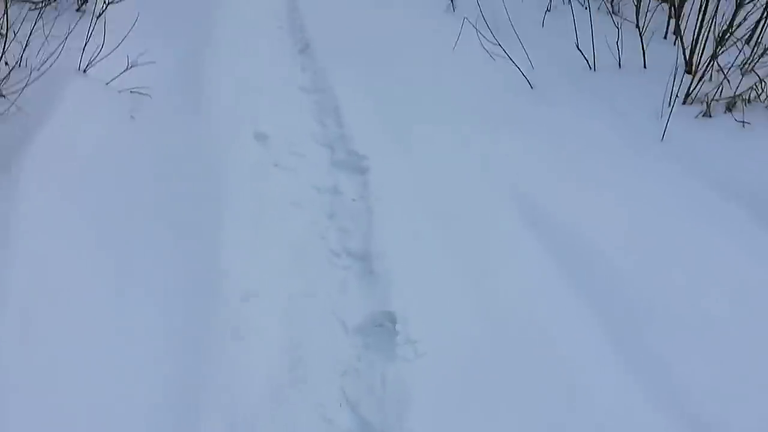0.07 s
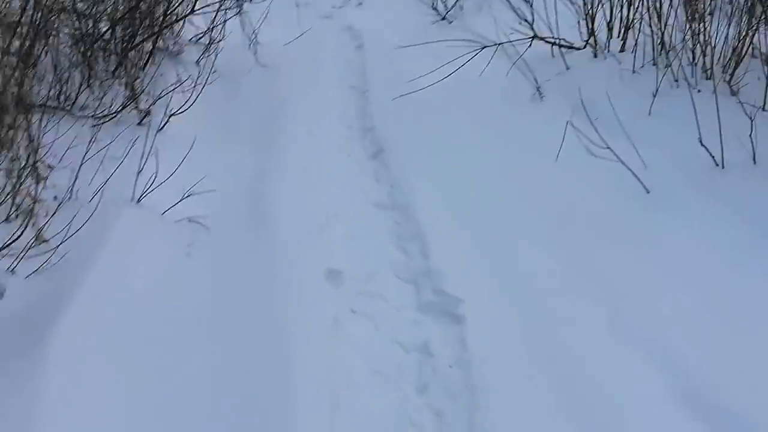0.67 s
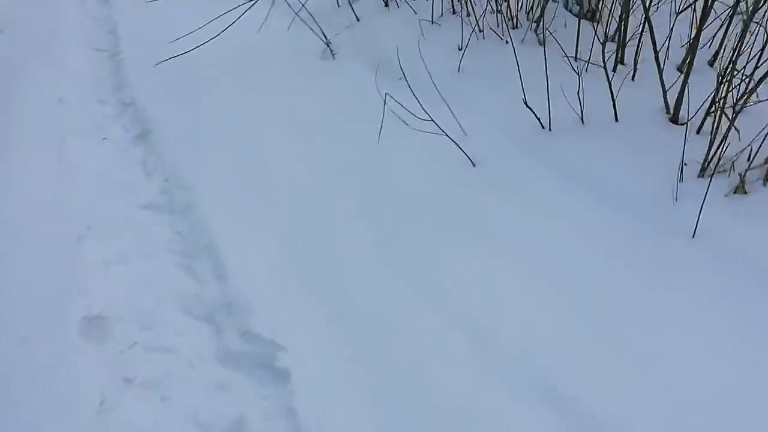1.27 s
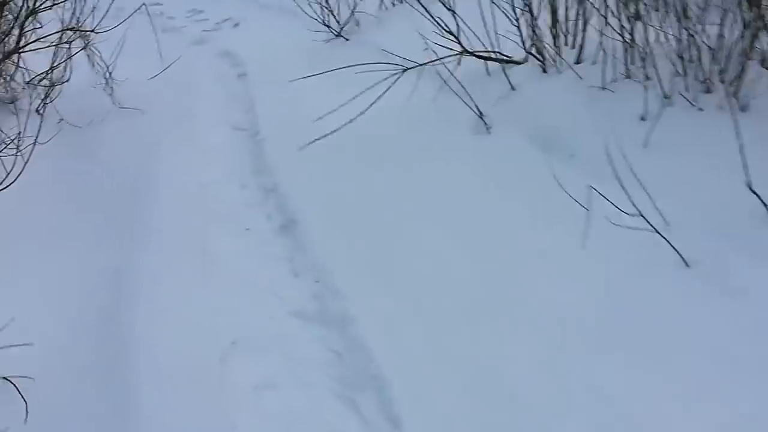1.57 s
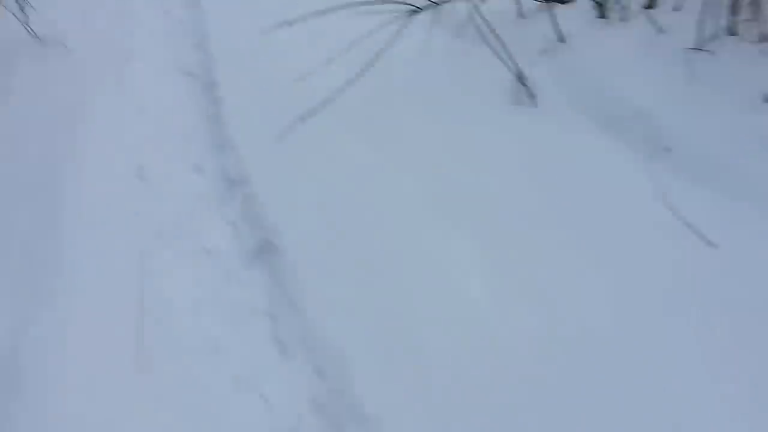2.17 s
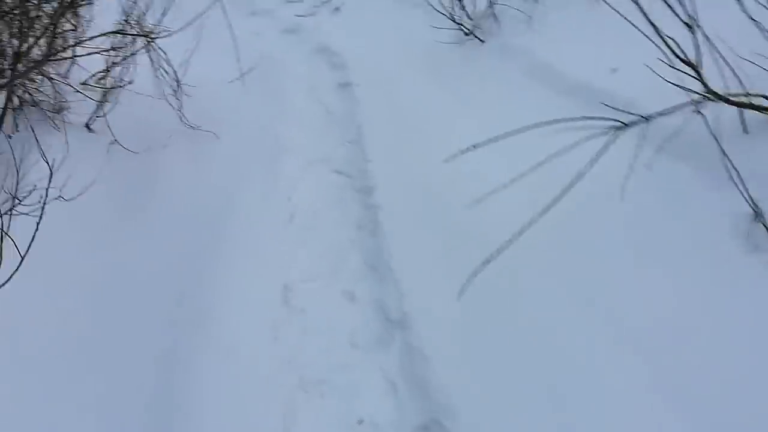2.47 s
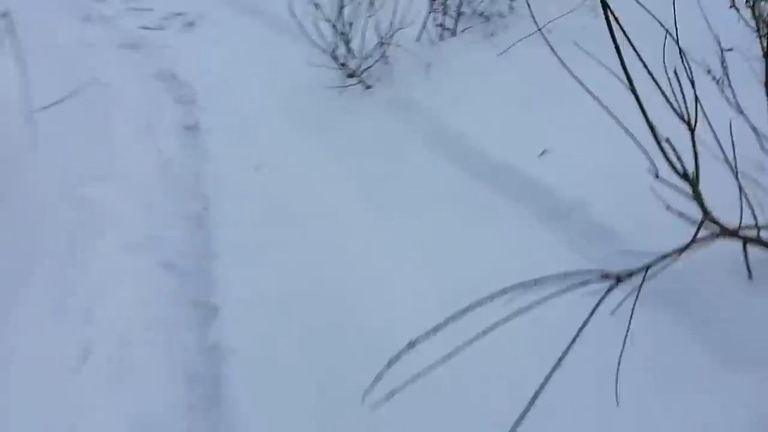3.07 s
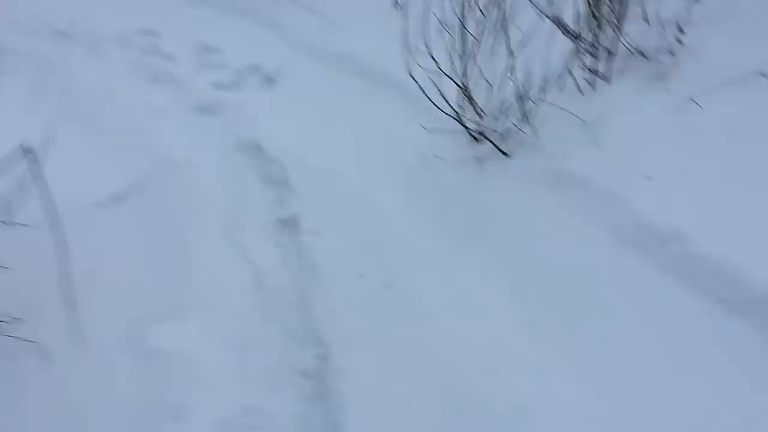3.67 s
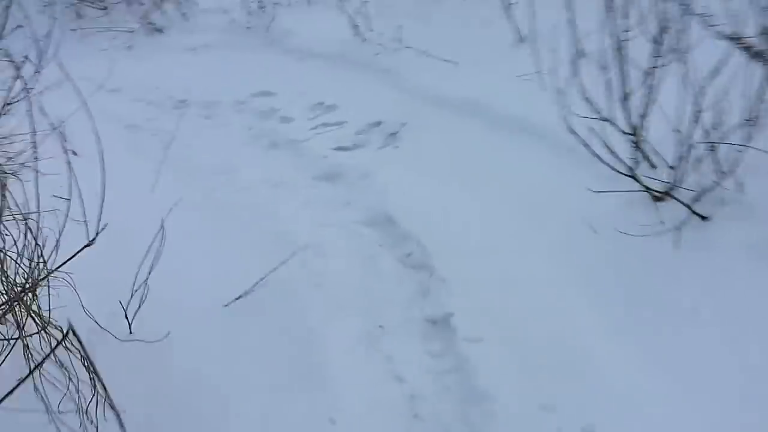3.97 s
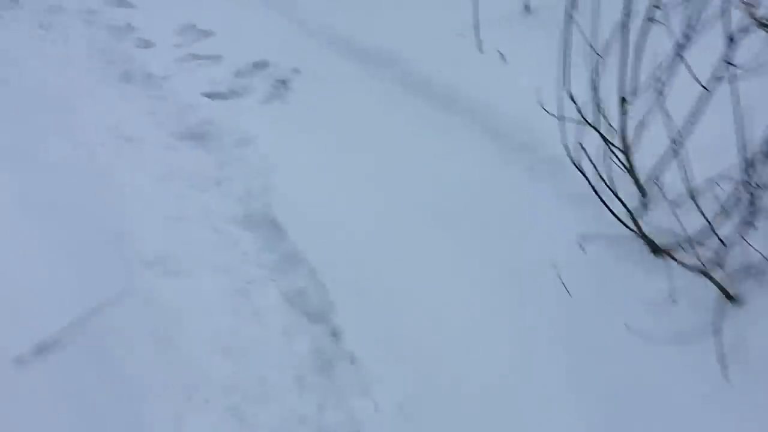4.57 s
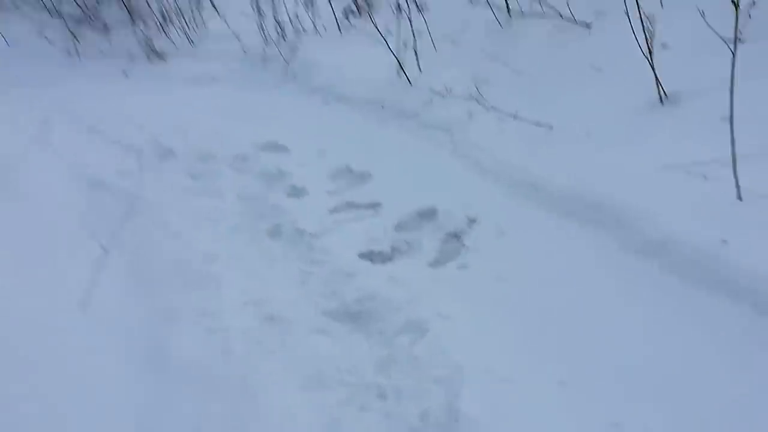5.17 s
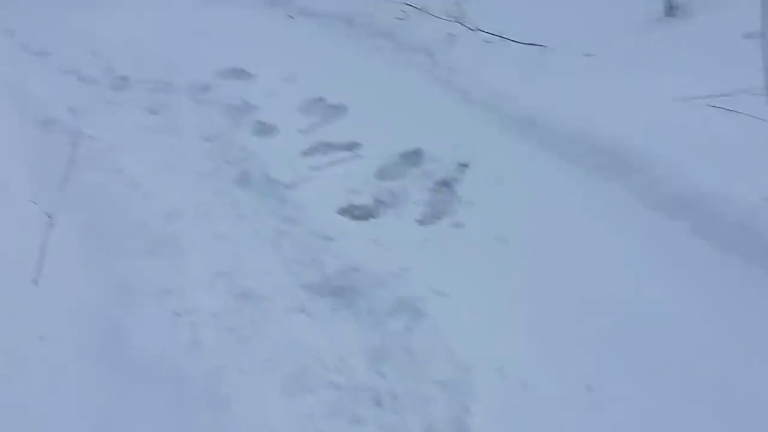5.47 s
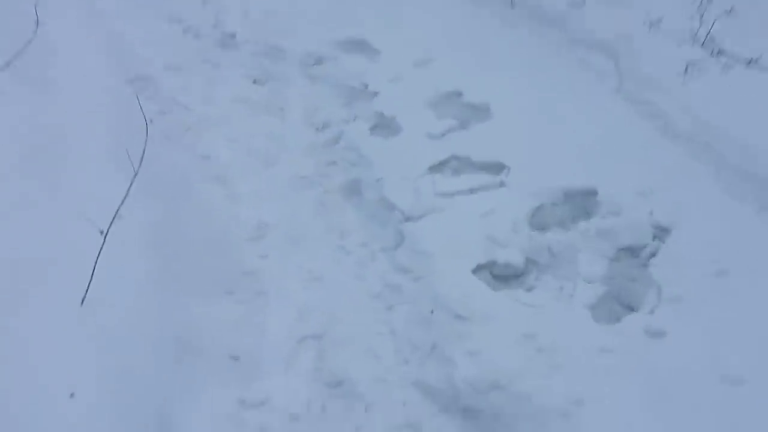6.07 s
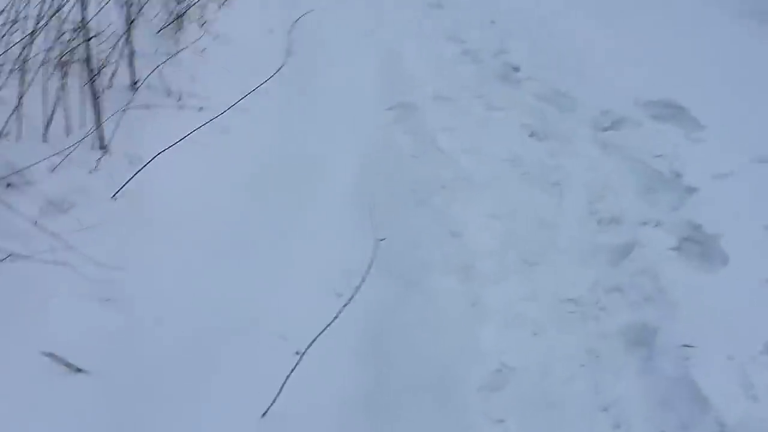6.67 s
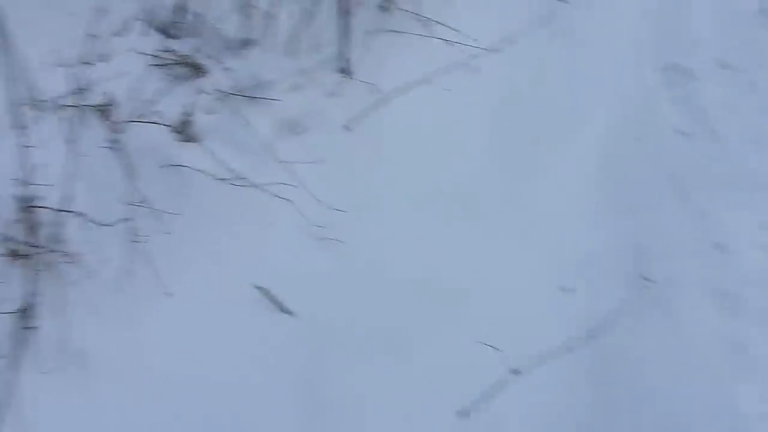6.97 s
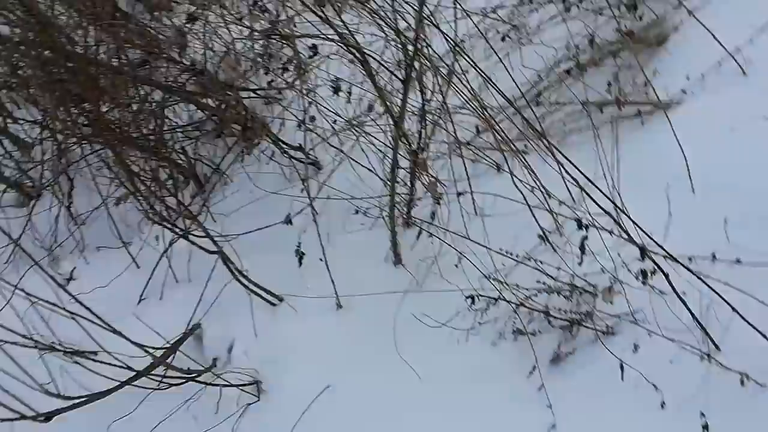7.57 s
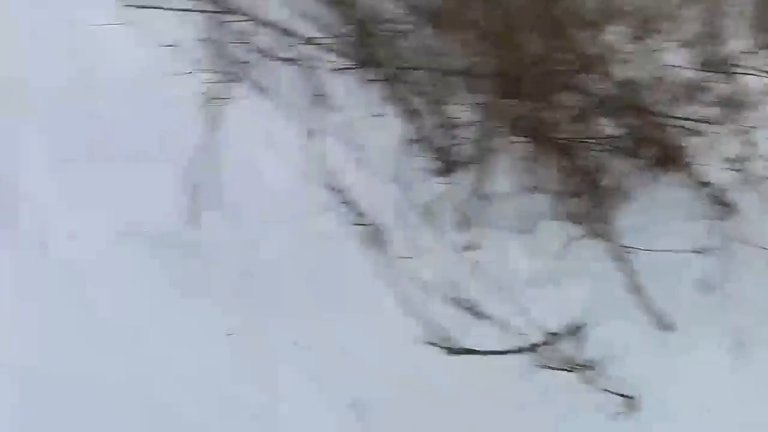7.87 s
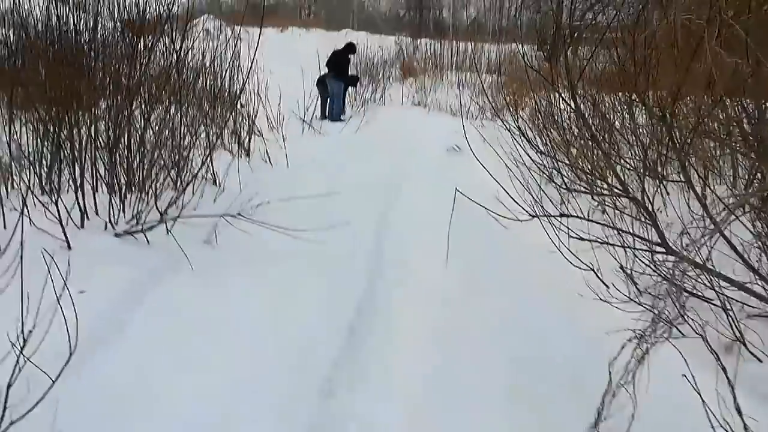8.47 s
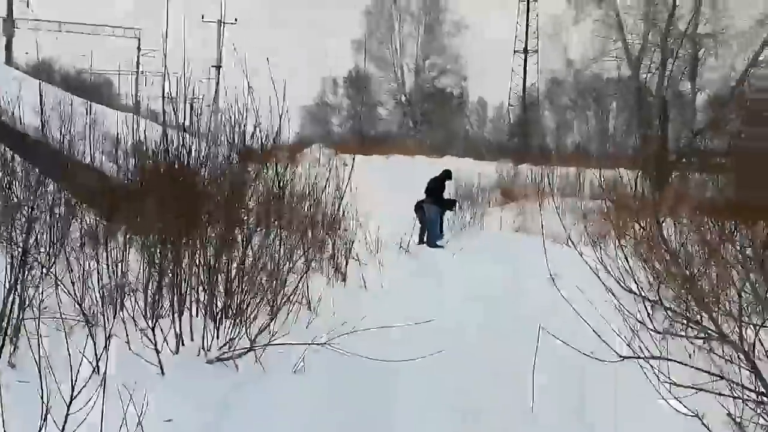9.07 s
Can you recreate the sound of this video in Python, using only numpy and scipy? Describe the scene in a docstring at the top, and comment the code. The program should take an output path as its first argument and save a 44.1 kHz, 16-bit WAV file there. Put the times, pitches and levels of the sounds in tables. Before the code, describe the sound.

Boots crunch and creak through packed snow at a steady walk while wind rumbles on the microphone.

```python
"""Boots crunch along cold, packed snow while wind rumbles on a hand-held camera's microphone.
At about two and a half steps a second, each boot crushes the crust, then creaks in stick-slip as it
rolls off, with single sharp snaps; loose powder hisses. The steps jolt the microphone, the hand knocks
the case now and then, and in the second half a sleeve swishes faintly."""
import sys
import numpy as np
from scipy import signal
from scipy.fft import rfft, irfft, next_fast_len
from scipy.io import wavfile
from scipy.ndimage import uniform_filter1d

SR = 44100
rng = np.random.default_rng(int(sys.argv[2]) if len(sys.argv) > 2 else 0)


def persist_wave(psi):
    """Save psi, clipped to +-1, as 16-bit WAV."""
    counts = np.round(np.clip(psi, -1, 1) * 32767).astype(np.int16)
    wavfile.write(sys.argv[1], SR, np.atleast_2d(counts).T)


N = 411453
N_FFT = next_fast_len(N + 4096, True)
TIME_S = np.arange(N) / SR
CONTROL_S = np.arange(0, N, SR // 1000) / SR
FREQ_HZ = np.fft.rfftfreq(N_FFT, 1 / SR)

def gain(db):
    """Decibels to amplitude."""
    return 10 ** (np.asarray(db) / 20)

def unit_rms(x):
    """Scales to rms 1."""
    return x / np.sqrt(np.mean(x ** 2) + 1e-20)

def steady(x, span_s):
    """Rms near 1 over each span; finer grain stays."""
    power = uniform_filter1d((x ** 2).mean(0), max(int(span_s * SR), 2))
    return x / np.sqrt(abs(power) + 0.0008 * power.mean())

def curve(table, column=1):
    """Table column interpolated over log frequency."""
    rows = np.array(table)
    return np.interp(np.log(FREQ_HZ + 1), np.log(rows[:, 0]), rows[:, column])

def colour(x, spectrum):
    """Filters by rows of freq_hz, gain_db."""
    return irfft(rfft(x, N_FFT) * gain(curve(spectrum)), N_FFT)[..., :N]

def noise_pair(correlation):
    """Partly shared white noise for two ports."""
    shared, own = rng.standard_normal((2, N))
    return np.array([shared, correlation * shared + np.sqrt(1 - correlation ** 2) * own])

def pulses(per_s, jitter, spread_db, count=9000):
    """Uneven clicks; as in stick-slip, a longer wait gives a bigger release."""
    per_s = np.full(N, per_s)
    wait, size = rng.standard_normal((2, count))
    wait = np.exp(jitter * wait)
    at = np.searchsorted(np.cumsum(per_s) / SR, np.cumsum(wait))
    clicks = np.zeros(N + 1)
    clicks[at] = np.sqrt(wait) * gain(spread_db * np.clip(size, -2, 2))
    return unit_rms(clicks[:N] / np.sqrt(per_s))

def tails(clicks, decay_ms):
    """Amplitude envelope of clicks with decaying energy."""
    pole = np.exp(-1000 / (decay_ms * SR))
    return unit_rms(np.sqrt(signal.lfilter([1], [1, -pole], clicks ** 2) + 1e-12))

def packet(hz, swell_ms, count=220):
    """Brief tone that swells and dies; energy 1."""
    t = (np.arange(count) - count // 2) / SR
    wave = np.cos(2 * np.pi * (hz * t + rng.random())) / np.cosh(1000 * t / swell_ms)
    return wave / np.linalg.norm(wave)

def add(mix, centre_s, sound):
    """Mixes in a sound centred on centre_s."""
    part = mix[max(round(centre_s * SR) - len(sound) // 2, 0):][:len(sound)]
    part += sound[:len(part)]

def swell(t, attack_s, hold_s, slope_db, release_s):
    """Rises about t = 0, changes by slope_db over the hold, dies away."""
    rise = np.clip(t / attack_s + .5, 0, 1)
    hold = gain(slope_db * np.clip(t / hold_s, 0, 1))
    return rise * hold * np.exp(-np.maximum(t - hold_s, 0) / release_s)

# Still air spectrum: freq_hz, gain_db
AIR_SPECTRUM = [(200, -34), (500, -12), (1900, -2.5), (2700, -6.5), (7200, -7), (10000, -18),
                (15500, -27.5)]
def still_air(level_db):
    """Faint, even hiss."""
    return gain(level_db) * unit_rms(colour(noise_pair(0.67), AIR_SPECTRUM))

# Breeze on the microphone: time_s, rumble_db, buffet_db
BREEZE = [(0.0, -40, -46.5), (1.27, -43, -55), (1.48, -35.5, -48), (1.97, -36, -33.5), (2.6, -43, -48),
          (3.972, -35, -29.5), (4.44, -39.5, -43.5), (5.74, -39.5, -46), (6.081, -50, -64), (6.5, -40, -47),
          (6.95, -49.5, -58.5), (7.9, -63.5, -69), (8.5, -55.5, -73), (8.73, -45.5, -53.5),
          (9.33, -50, -57)]
# Puffs of air: peak_s, length_s, rumble_db, buffet_db
GUSTS = [(0.127, 0.04, -30, -39), (0.195, 0.13, -35.5, -36.5), (0.95, 0.079, -31, -30.5),
         (1.398, 0.17, -29, -32.5), (1.707, 0.04, -43.5, -25), (1.775, 0.058, -33, -28),
         (1.947, 0.067, -44, -23), (2.335, 0.055, -30, -32.5), (3.144, 0.11, -31.5, -27),
         (3.279, 0.16, -42, -30.5), (3.626, 0.021, -35, -27), (3.943, 0.045, -26, -29.5),
         (4.021, 0.1, -33, -27), (4.697, 0.071, -36, -33.5), (4.762, 0.05, -48, -30.5),
         (5.352, 0.03, -34.5, -33.5), (5.58, 0.17, -35, -35.5), (5.795, 0.038, -35, -33.5),
         (6.418, 0.11, -56, -36.5), (8.645, 0.073, -28, -29)]
def airflow():
    """Rumble and buffet envelopes: short puffs over a breeze that drops as the walker turns."""
    time_s, *levels_db = np.transpose(BREEZE)
    power = gain([np.interp(CONTROL_S, time_s, db) for db in levels_db]) ** 2
    for peak_s, length_s, rumble_db, buffet_db in GUSTS:
        puff = np.exp(-abs(2 * (CONTROL_S - peak_s) / length_s) ** 2.55)
        power += gain([[rumble_db], [buffet_db]]) ** 2 * puff
    return [np.interp(TIME_S, CONTROL_S, np.sqrt(p)) for p in power]

# Wind rumble spectrum: freq_hz, gain_db
RUMBLE_SPECTRUM = [(8, -35), (25, -1), (45, 4), (130, 0.5), (200, -18.5), (500, -89)]
# Buffet spectrum: freq_hz, gain_db
BUFFET_SPECTRUM = [(40, -26), (100, -4), (160, 2), (250, -2.5), (520, -19), (900, -27), (2500, -67)]
def wind_and_handling(jolt, knocks, left_lag_ms):
    """Air rumbles; puffs and step jolts buffet the microphone.
    Buffets and knocks sound slightly earlier and louder on the right."""
    eddies = .8 + tails(pulses(per_s=11, jitter=.45, spread_db=1.5), decay_ms=22)
    rumble = steady(colour(eddies * noise_pair(.97), RUMBLE_SPECTRUM), span_s=.2)
    lumps = 0.11 + tails(pulses(per_s=26, jitter=.5, spread_db=3), decay_ms=4.46)
    buffet = steady(colour(lumps * noise_pair(.94), BUFFET_SPECTRUM), span_s=.045)
    flutter_spectrum = [(120, -6.5), (300, 4), (550, -6), (1000, -24), (2200, -85)]
    flutter = unit_rms(colour(noise_pair(0.48), flutter_spectrum))
    flow, puffs = airflow()
    force = np.hypot(puffs, jolt)
    hardness = np.clip(force / gain(-23.5), 0, 1) ** 1.3
    left, right = force * (buffet + hardness * flutter) + knocks
    left = np.roll(left, round(left_lag_ms * SR / 1000))
    return flow * rumble + np.array([left, right]) * gain([[-1.8], [1.3]])

# Hand knocks on the case: centre_s, level_db, pitch_hz
HAND_KNOCKS = [(0.198, -32.5, 278), (0.644, -30, 157), (1.6871, -22, 368), (1.7219, -21, 346),
               (4.082, -26, 249.2), (5.222, -24, 87), (9.085, -38, 170), (9.198, -37, 95)]
def hand_knocks(swell_cycles, overtone_ratio):
    """The hand shifts on the case: dull knocks with an overtone, longer when deeper."""
    out = np.zeros(N)
    for centre_s, level_db, hz in HAND_KNOCKS:
        swell_ms = 1000 * swell_cycles / hz
        knock = packet(hz, swell_ms, count=1764)
        knock += 0.22 * packet(overtone_ratio * hz, swell_ms, count=1764)
        add(out, centre_s, gain(level_db) * np.sqrt(SR / 100) * knock)
    return out

# Footsteps, relative levels: landing_s, attack_s, press_s, sag_db, creak_db, crust_db, powder_db,
# plough_db, roll_s, loose_db
STEPS = [(.284,0.017,0.058,-3,-36,-47,-54.5,-49,0.35,-55),
         (.803,0.019,0.074,-5,-30.5,-39.5,-50,-55,0.18,-54),
         (1.359,0.0062,0.046,-4,-31.5,-36,-43,-56,0.27,-52), (1.788,0.0035,.065,-6,-37,-41,-46,-54,.11,-51),
         (2.206,0.0055,.13,-9,-33.5,-39.5,-46.5,-61.5,0.21,-55),
         (2.635,.013,0.14,-2.5,-34,-45.5,-47.5,-51,0.19,-57),
         (3.055,.018,0.16,-14,-60,-35.5,-44,-55,0.078,-52),
         (3.458,.016,0.13,-1,-38.5,-44,-45,-51.5,0.1,-53), (3.85,0.015,0.084,-4,-34,-42,-49.5,-53,.16,-53),
         (4.258,0.015,0.098,-1,-39,-44,-42,-53.5,0.21,-56.5),
         (4.633,0.0061,.13,-3,-35.5,-42,-46,-60.5,0.11,-60.5),
         (4.979,0.068,.16,1,-39.5,-47,-50.5,-59.5,.27,-58), (5.438,.014,.12,-4,-40.5,-43,-54,-57,0.23,-55),
         (5.89,0.034,.12,-7,-29.5,-45,-55.5,-54,0.14,-56.5),
         (6.267,0.025,.155,-2.5,-45,-48.5,-51.5,-54,0.013,-64.5),
         (6.668,.031,0.071,-8,-33.5,-36.5,-45.5,-58,0.18,-63),
         (7.039,.087,.12,2,-50.5,-59.5,-62,-61,.021,-63),
         (7.228,0.0079,.12,-12.5,-35.5,-34.5,-44,-58,0.33,-62), (7.66,.012,.18,1,-42,-47.5,-50,-57,.12,-55),
         (8.129,0.034,0.061,-3.5,-51.5,-62.5,-60,-61.5,.13,-61),
         (8.513,0.055,0.093,-3,-44,-51.5,-58,-59,0.36,-57.5),
         (9.068,0.024,0.076,-2.5,-53,-50.5,-51.5,-61,0.27,-61.5)]
# Creaks under the toe as the weight rolls forward: start_s, length_s, level_db
TOE_CREAKS = [(.35, 0.24, -47.5), (1.091, 0.23, -40.5), (1.406, 0.19, -40.5), (2.342, .17, -43.5),
              (3.186, 0.055, -53), (5.136, .24, -47), (5.563, 0.21, -47), (6.0, 0.064, -42.5)]
def gait():
    """Creak, crust and powder envelopes: each boot ploughs in, presses down and rolls off."""
    power = np.zeros((3, len(CONTROL_S)))
    for landing_s, attack_s, press_s, sag_db, *layers_db, plough_db, roll_s, loose_db in STEPS:
        t = CONTROL_S - landing_s
        plough = gain(plough_db) * np.exp(-((t + 0.02543) / .08) ** 2)  # peaks before the landing
        bite = gain(-7) * np.exp(-abs(t) / .016)
        sags_db = sag_db * np.array([[1], [1], [0.34]])  # powder sags less
        weight = swell(t, attack_s, press_s, sags_db, release_s=.016)
        press = np.hypot(bite, weight) * gain(layers_db)[:, None]
        roll = swell(t - press_s, attack_s=0.0304, hold_s=roll_s, slope_db=-3, release_s=.03)
        power += plough ** 2 + press ** 2 + (gain(loose_db) * roll) ** 2
    for start_s, length_s, level_db in TOE_CREAKS:
        toe = swell(CONTROL_S - start_s, attack_s=0.037, hold_s=length_s, slope_db=0.5, release_s=.05)
        power[0] += (gain(level_db) * toe) ** 2
    return [np.interp(TIME_S, CONTROL_S, np.sqrt(p)) for p in power]

# Port response to ground sound: freq_hz, left_db, right_db
PORT_RESPONSE = [(151, -13, -15), (334, -1, -0.5), (554, -3.5, -2.5), (1220, -6, -4.5), (1990, -20, -3.5),
                 (2520, -11.5, -12), (3680, -12.5, -6.5), (5260, -17.5, -24.5), (6800, -15.5, -8.5),
                 (7800, -19, -14.5), (10930, -43.5, -51.5), (13200, -47, -42)]
# Phase lead of the left channel: freq_hz, lead_rad
LEFT_LEAD = [(100, -2), (280, -0.53), (700, 0.54), (1700, 0.42), (2100, 2), (3300, 1.84), (4200, 4),
             (9000, 5.5)]
def ports(x, spectrum):
    """Colours a snow sound and passes it through the two microphone ports."""
    left = gain(curve(PORT_RESPONSE)) * np.exp(1j * curve(LEFT_LEAD))
    right = gain(curve(PORT_RESPONSE, column=2))
    response = np.array([left, right]) * gain(curve(spectrum))
    return irfft(rfft(x, N_FFT) * response, N_FFT)[:, :N]

# Creak pitch, lower in deep, soft snow: time_s, pitch_hz
CREAK_PITCH = [(0.18, 1260), (0.49, 1700), (1.22, 1380), (1.6, 1840), (1.92, 1390), (2.49, 1743),
               (2.96, 1280), (3.38, 1603), (4.65, 1279), (4.78, 1770), (5.09, 1124), (5.17, 1580),
               (8.89, 1201)]
def squeaks(clicks, pitch_ratio, spread, swell_ms, count=260):
    """One squeak per slip, scattered in length and about a multiple of the creak pitch."""
    at, out = np.flatnonzero(clicks), np.zeros(N_FFT)
    detune, stretch, phase = rng.standard_normal((len(at), 3)).T[:, :, None]
    creak_hz = np.interp(at / SR, *np.transpose(CREAK_PITCH))[:, None]
    hz = pitch_ratio * creak_hz * np.exp(spread * detune)
    width_ms = swell_ms * np.exp(.3 * stretch)
    t = (np.arange(count) - count // 2) / SR
    waves = np.cos(2 * np.pi * (hz * t + phase)) / np.cosh(1000 * t / width_ms)
    waves /= np.linalg.norm(waves, axis=1, keepdims=True)
    np.add.at(out, at[:, None] + np.arange(count), clicks[at, None] * waves)
    return out[count // 2:][:N]

def hollows(x, hump_db, hump_octaves=0.79, patch_db=3.5, patch_s=.07, patch_hz=600):
    """Cavities under the sole colour the crunch in shifting patches, with a hump at the creak pitch."""
    hz, t, frames = signal.stft(x, SR, nperseg=512, noverlap=384)
    patches = uniform_filter1d(rng.standard_normal((len(t), len(hz))), round(patch_s / t[1]), axis=0)
    patches = unit_rms(uniform_filter1d(patches, round(patch_hz / hz[1]), axis=1)).T
    octaves = np.log2((hz[:, None] + 1) / np.interp(t, *np.transpose(CREAK_PITCH)))
    frames *= gain(patch_db * patches + hump_db * np.exp(-(octaves / hump_octaves) ** 2))
    return signal.istft(frames, SR, nperseg=512, noverlap=384)[1][:, :N]

# Creaking snow spectrum: freq_hz, gain_db
CREAK_SPECTRUM = [(150, -4), (450, -2.5), (900, 1), (2000, 4.5), (2800, 4), (9000, -22)]
def creak(strain, load, slips, shower):
    """Stick-slip: a crowd of small slips under load thins to an even run as the boot rolls off."""
    run = squeaks(slips, pitch_ratio=1, spread=.18, swell_ms=.38)
    small_slips = pulses(per_s=800, jitter=0.76, spread_db=2.5)
    crowd = squeaks(small_slips, pitch_ratio=.78, spread=.35, swell_ms=.7) + .8 * noise_pair(.4)
    source = run + (.2 + .7 * load ** 2) * crowd + .38 * shower * noise_pair(.5)
    return strain * steady(hollows(ports(source, CREAK_SPECTRUM), hump_db=1), span_s=0.0456)

def crystals(per_s, spread_db):
    """Envelope of single ice grains breaking at random."""
    size = gain(spread_db * np.minimum(rng.exponential(1, N), 4))
    return tails(size * (rng.random(N) < per_s / SR), decay_ms=0.46)

# Crushed crust spectrum: freq_hz, gain_db
CRUST_SPECTRUM = [(200, -0.5), (600, -5), (1300, -6), (2200, 1), (3400, 2.5), (5000, 1), (6500, -9),
                  (9000, -1), (15000, 3)]
def crust(crush, shower):
    """The crust breaks in noise bursts, from slips and from single grains."""
    grains = (0.65 * shower + 0.65 * crystals(per_s=700, spread_db=1.5) + 0.28) * noise_pair(0.64)
    crunch = steady(hollows(ports(grains, CRUST_SPECTRUM), hump_db=9), span_s=0.054)
    return gain(6.5) * crush * crunch

# Loose powder spectrum: freq_hz, gain_db
POWDER_SPECTRUM = [(2500, -23), (4500, -7), (6000, -1.5), (8500, -3), (10500, 1.5), (15000, -5)]
def powder(kick, load, shower):
    """Loose grains hiss; a hard kick throws off a fizz of the finest crystals."""
    flicker = (0.17 + 0.26 * load) * shower + 0.8 * crystals(per_s=420, spread_db=3.5)
    grains = (flicker + 1.6) * noise_pair(0.1)
    hiss = steady(hollows(ports(grains, POWDER_SPECTRUM), hump_db=12), span_s=0.11)
    fizz = unit_rms(colour(grains, [(6000, -30), (9000, 6), (12000, 7), (15000, 0)]))
    hardness = np.clip(kick / gain(-46.5), 0, 1)
    return kick * (gain(4) * hiss + gain([[-32], [-27]]) * hardness * fizz)

def boots(strain, crush, kick):
    """One train of slips, faster under load, drives creak, crust and powder."""
    load = np.clip(crush / gain(-42), 0, 1)
    slips = pulses(per_s=130 + 150 * load ** 2, jitter=.42, spread_db=4.3)
    shower = np.roll(tails(slips, decay_ms=.7), -round(.0004 * SR))  # noise envelope of the slips
    return creak(strain, load, slips, shower) + crust(crush, shower) + powder(kick, load, shower)

# Packed snow giving way at once, relative levels: time_s, squeak_db, tick_db, pitch_hz
SNAPS = [(.256,-41,-65,1480), (0.297,-38,-54,1410), (0.3856,-40,-52,1570), (.402,-39.5,-55,1590),
         (0.459,-44,-78,1660), (0.4857,-33.5,-49,1960), (0.5907,-35,-48.5,1600), (0.64,-38.5,-46,1850),
         (.682,-37.5,-43,1840), (0.739,-46,-44,1460), (0.879,-33,-48,1310), (1.0134,-42,-75,1360),
         (1.125,-43,-57,1524), (1.277,-49,-63,1440), (1.4738,-39,-55,1773), (1.516,-37.5,-60,1660),
         (1.589,-37,-51.5,2052), (1.652,-58,-44.5,1820), (1.7998,-31.5,-47,1846), (1.9326,-36,-63,1420),
         (2.062,-46.5,-57,1670), (2.2117,-36.5,-45.5,1790), (2.3384,-53,-44,1438), (2.526,-38,-53,1830),
         (2.6976,-34,-59,1460), (2.7195,-37,-60,1360), (2.7527,-35,-60,1631), (2.7689,-34,-49,1579),
         (2.885,-38.5,-51.5,1269), (3.1822,-42,-59,1306), (3.381,-55,-44,1858), (3.535,-37,-55,1720),
         (4.079,-43,-53,1699), (4.266,-37.5,-42.5,1602), (4.3393,-36,-48,1310), (4.396,-37.5,-43,1430),
         (4.457,-40,-50.5,1461), (4.513,-40.5,-53.5,1760), (4.5785,-39,-63,1429), (4.6436,-35.5,-44,1471),
         (4.703,-38,-57,1770), (4.785,-37.5,-43.5,1770), (5.036,-37.5,-46,1510), (5.1362,-38,-72,1379),
         (5.174,-38.5,-53,1618), (5.2353,-33.5,-52,1580), (5.3143,-37,-70,1700), (5.372,-44.5,-60,1274),
         (5.557,-36,-55,1249), (5.806,-38.5,-57,1682), (5.954,-45,-53,1210), (6.05,-39.5,-60,1636),
         (6.115,-37.5,-50.5,1547), (6.278,-36,-47.5,1644), (6.335,-36,-72,1600), (6.351,-37,-51.5,1540),
         (6.403,-40,-45,1850), (6.4575,-44.5,-48,1825), (6.7347,-34,-56,1726), (6.7623,-42.5,-53.5,1576),
         (7.141,-37.5,-61,1786), (7.1681,-39,-47.5,1710), (7.2244,-38.5,-49,1377), (7.346,-52,-41,1325),
         (7.467,-48.5,-51.5,1444), (7.5517,-46,-57,1560), (7.5787,-42.5,-56,1542),
         (7.6141,-39.5,-48.5,1544), (7.624,-41.5,-49,1420), (7.657,-41.5,-50.5,1512),
         (8.155,-45.5,-55.5,1399), (8.619,-41,-70,1281), (8.841,-46.5,-57,1383), (8.874,-47,-49.5,1500),
         (8.952,-51.5,-55.5,1202), (8.997,-47,-56,1360)]
def snaps(crumble, tick_ms, gap_ms, knock_hz, count=1323):
    """Big slips: a staged squeak, crumbling, a tick of broken ice and a knock as the boot drops."""
    ms = (np.arange(count) - count // 2) * 1000 / SR
    drop = unit_rms(np.sin(2 * np.pi * knock_hz * ms / 1000) / np.cosh((ms - 1) / 1.14))
    squeals, rubble, ticks, knocks = np.zeros((4, N))
    for time_s, squeak_db, tick_db, hz in SNAPS:
        brittle = min(gain(tick_db - squeak_db), 1)  # stronger later stages, longer crumbling
        carry = np.sqrt(brittle)
        stages = carry ** np.arange(3)
        stages *= gain(squeak_db) * np.sqrt(SR / 100) / np.linalg.norm(stages)
        for k, scatter in enumerate(rng.uniform(-0.78, 1, 3)):
            squeak = packet(hz * (1 + .12 * k * scatter), swell_ms=.52 - .24 * carry)
            add(squeals, time_s + k * gap_ms * (1 + .3 * scatter) / 1000, stages[k] * squeak)
        burst = unit_rms(1 / np.cosh((ms - gap_ms * brittle) / (tick_ms + 1.9 * brittle)))
        add(rubble, time_s, gain(squeak_db) * crumble * carry * burst)
        add(ticks, time_s, gain(tick_db) * burst)
        knock_db = squeak_db - 2 - 17.5 * np.log2(hz / 1550)  # deep snaps drop the boot further
        add(knocks, time_s, gain(knock_db) * carry * drop)
    body = ports(squeals + rubble * noise_pair(0.55), CREAK_SPECTRUM)
    return gain(7) * body + gain(12) * ice_ticks(ticks) + knocks

# Breaking ice spectrum: freq_hz, gain_db
TICK_SPECTRUM = [(900, -34), (2000, 0), (3200, 3), (15000, 12)]
def ice_ticks(bursts):
    """Ice breaks in bright bursts of noise."""
    return ports(bursts * noise_pair(0.089), TICK_SPECTRUM)

# Sleeve rubbing the jacket: centre_s, length_s, level_db, nominal_pitch_hz
SWISHES = [(5.136, 0.29, -47, 6760), (5.52, 0.22, -48, 4704), (6.341, 0.15, -52, 14200),
           (7.034, 0.42, -48.5, 4690), (8.108, 0.36, -52.5, 4320), (8.523, 0.39, -49.5, 5760)]
def sleeve(width_ratio, lower_ratio, jacket_hz, jacket_db):
    """Ribbed cloth hisses in two bands that follow arm speed, over the jacket's hollow note."""
    out = np.zeros((2, N))
    for centre_s, length_s, level_db, hz in SWISHES:
        span = abs(TIME_S - centre_s) < length_s / 2
        speed = np.cos(np.pi * (TIME_S[span] - centre_s) / length_s)
        noise = rng.standard_normal((3, 2, len(speed), 2)) @ [1, 1j]
        lowpass = signal.butter(2, width_ratio * hz / 2, fs=SR, output="sos")
        upper, lower, hollow = signal.sosfilt(lowpass, noise)
        phase = 2 * np.pi * np.cumsum(hz * (0.95 + 0.2 * speed)) / SR
        ribs = upper * np.exp(1j * phase) + lower * np.exp(1j * lower_ratio * phase)
        jacket = gain(jacket_db) * hollow * np.exp(2j * np.pi * jacket_hz * TIME_S[span])
        out[:, span] += gain(level_db) * speed ** 1.25 * unit_rms((ribs + jacket).real)
    return out

def scene():
    """Dry sum; open snow gives no echo."""
    strain, crush, kick = gait()
    mix = still_air(level_db=-60)
    knocks = hand_knocks(swell_cycles=0.22, overtone_ratio=2.85)
    mix += wind_and_handling(jolt=gain(-7.5) * crush, knocks=knocks, left_lag_ms=0.84)
    mix += boots(strain, crush, kick)
    mix += snaps(crumble=2, tick_ms=1, gap_ms=2.614, knock_hz=210)
    return mix + sleeve(width_ratio=0.27, lower_ratio=.75, jacket_hz=2085, jacket_db=1)

def record(dry):
    """Band limit at 15.8 kHz."""
    return irfft(rfft(dry, N_FFT) * (FREQ_HZ < 15800), N_FFT)[:, :N]

dry = scene()
out = record(dry)
persist_wave(out)
```